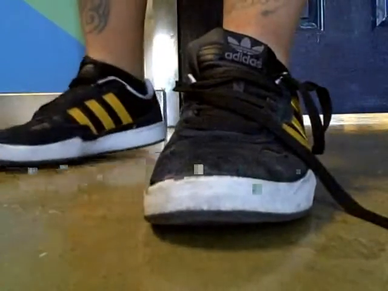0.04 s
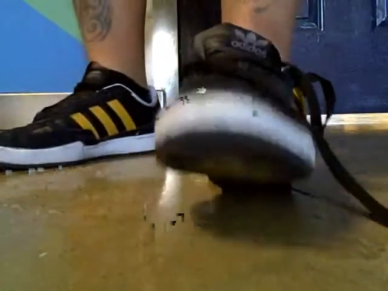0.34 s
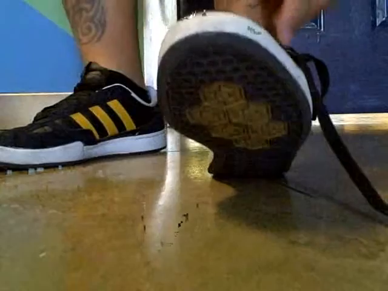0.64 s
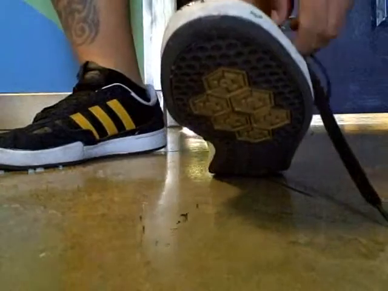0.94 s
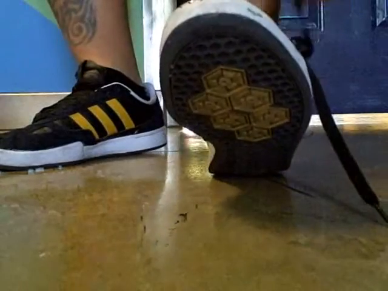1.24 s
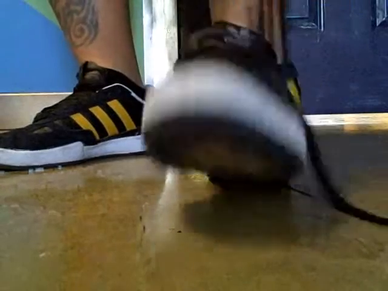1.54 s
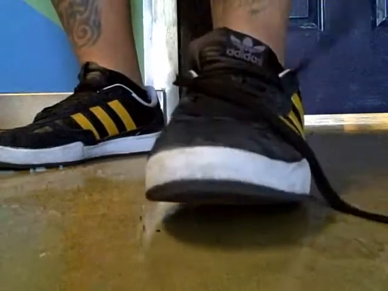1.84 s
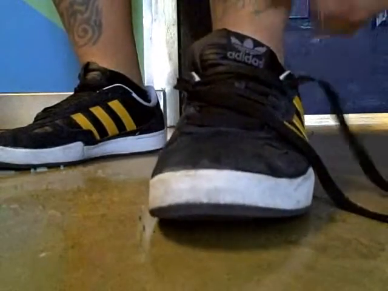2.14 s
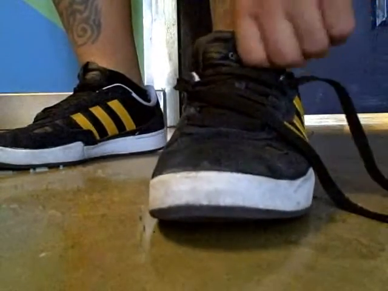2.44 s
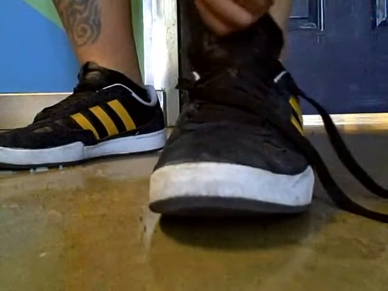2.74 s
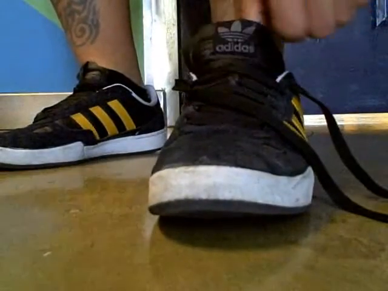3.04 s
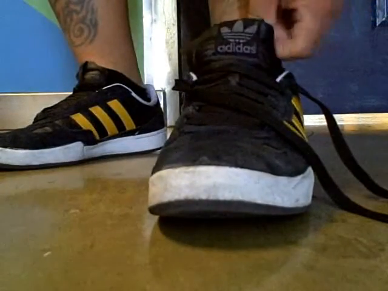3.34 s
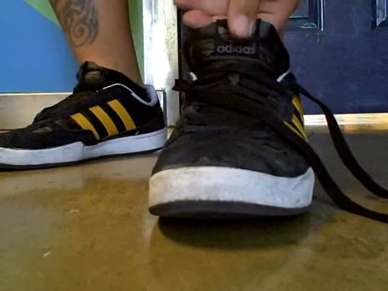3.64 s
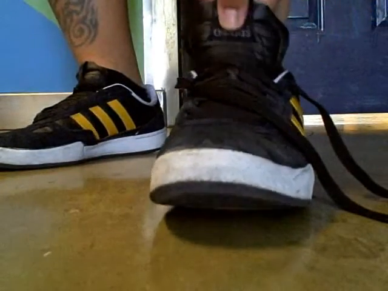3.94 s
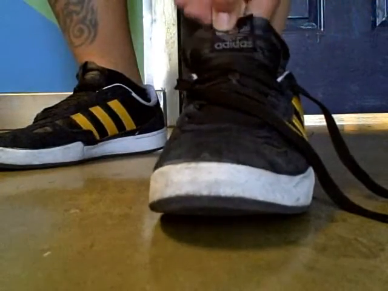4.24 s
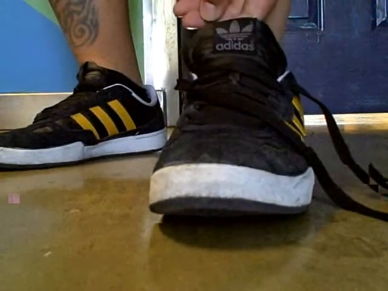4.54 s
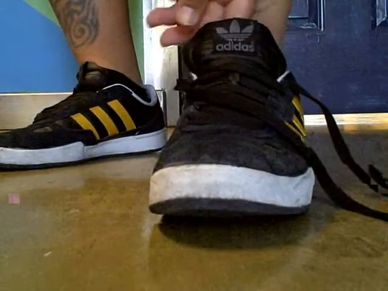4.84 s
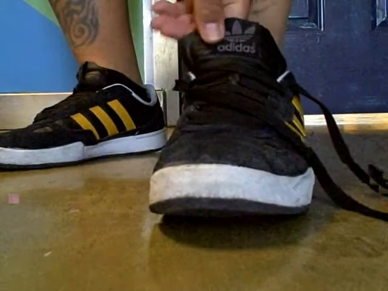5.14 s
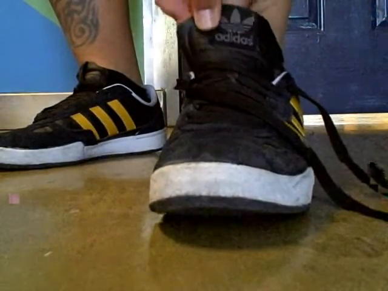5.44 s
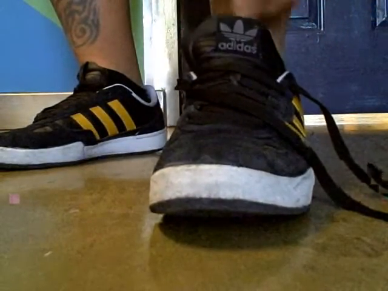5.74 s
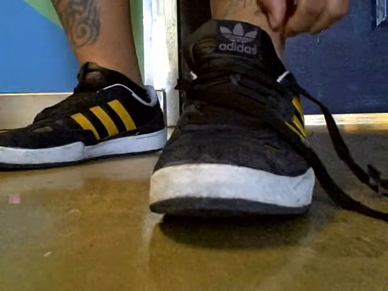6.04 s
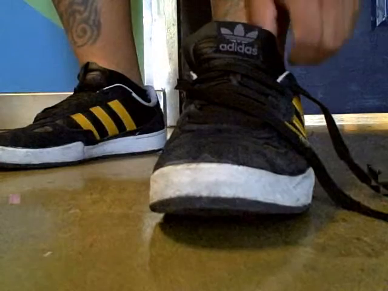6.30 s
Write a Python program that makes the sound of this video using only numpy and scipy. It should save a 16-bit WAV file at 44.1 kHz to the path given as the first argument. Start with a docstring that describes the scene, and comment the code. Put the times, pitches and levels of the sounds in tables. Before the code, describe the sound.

A small microphone is close to a sneaker in a slightly reverberant room, where a low appliance hum and faint hiss continue throughout. Everything is quiet, with crisp treble. At the start the shoe gives a soft knock and a rustling scuff as the toe lifts and the heel pivots on grit. Rubbing builds again after 1 second, and at 1.5 the sole comes down with a dull bump, clicks and a short creak. From 2 seconds fingers flick a lace and tug the tongue, making uneven bursts of cloth rubbing with small ticks and dull undertones. The strongest come near 2.6 and 4.2 seconds, with a sharp tick at 3.6. Near 4.6 all sound cuts out for a split second. A rustle and light bump follow at 5, another tug at 5.4, and fingers slide along the collar around 6.2 to 6.5.

```python
"""Indoors, a small microphone close to a sneaker on a hard floor; an appliance hums throughout.
The toe lifts and the foot rocks on its heel over grit; at 1.5 s the sole comes down with a dull bump
and a creak. From 2 s fingers flick a loose lace and tug at the tongue: cloth rubs and ticks, the padded
upper and the sole answer dully. Near 4.6 s the sound cuts out for a moment. Then the tongue is set
straight and fingers slide along the collar."""
import sys
import numpy as np
from scipy import signal
from scipy.fft import rfft, irfft
from scipy.io import wavfile

SR = 44100
rng = np.random.default_rng(int(sys.argv[2]) if len(sys.argv) > 2 else 0)


def inscribe(sig):
    """Save sig as 16-bit PCM at rate SR to the path in sys.argv[1].

    A 1-D sig is mono; a 2-D sig holds one channel per row.
    Samples are clipped to [-1, 1] before scaling.
    """
    pcm = np.round(np.clip(np.atleast_2d(sig).T, -1, 1) * 32767)
    wavfile.write(sys.argv[1], SR, pcm.astype(np.int16))


N = 285270

# mains hum, motor tones and a thin electronic whine: f/Hz, level/dB
HUM_TONES = [(58.8, -60.5), (120, -58.5), (176.5, -77), (217.5, -73), (240, -69), (360, -77.5),
             (479.5, -79.5), (563.5, -73.5), (588.5, -76.5), (683.5, -71.5), (708.5, -76.5), (734.5, -74),
             (7601, -80), (7655, -80), (8344, -80.5), (8403, -80.5)]
# spectra of the room's air and of slips in cloth, padded upper, rubber sole and grit: f/Hz, level/dB
AIR_SPECTRUM = [(12, 8.5), (30, 7), (70, 4), (150, -1), (300, -10), (700, -16), (1000, -20.5),
                (2000, -22.5), (4000, -20), (6500, -49), (10000, -45), (15500, -27)]
CLOTH_SPECTRUM = [(60, -15), (200, -1), (700, -3), (1400, 1), (2300, 2), (3900, 0.5), (5700, 0.5),
                  (10000, 1), (15500, -1)]
UPPER_SPECTRUM = [(200, -33.5), (500, -10), (680, 0), (850, 4), (1100, -3), (1400, -1.5), (2200, -7.5),
                  (3500, -9.5), (12000, -50.5)]
SOLE_SPECTRUM = [(60, -21), (170, -13), (310, -1.5), (420, -1), (600, -1), (900, -9), (2000, -38.5),
                 (12000, -53)]
GRIT_SPECTRUM = [(400, -19.5), (1200, -6.5), (2000, -3.5), (2800, 0), (3800, -4.5), (5500, -10),
                 (12000, -27)]
# cloth shifting softly against hand and ankle between the moves: t/s, level/dB
CLOTH_SHIFTS = [(0, -69), (0.07, -57), (0.93, -63), (1.27, -56), (1.72, -58), (1.83, -64), (2.15, -61),
                (2.3, -67), (2.5, -57), (3.12, -62.5), (3.55, -53.5), (4.13, -64), (4.55, -57.5),
                (4.75, -64), (5.17, -61), (5.35, -63), (5.69, -57.5), (5.74, -70)]
# moves of the foot and pulls of the fingers, each sliding cloth and bending the upper:
# t/s, attack/s, hold/s, release/s per 20 dB, cloth level/dB, upper level/dB
MOVES = [(0.02, .33, .06, .37, -43, -66.5), (0.995, .02, .02, .15, -61, -80),
         (1.14, .21, .045, .11, -54, -58.5), (1.455, .006, .008, .03, -50, -57),
         (1.491, .008, .045, .06, -45.5, -44.5), (1.540, .013, .07, .1, -42.5, -45),
         (1.855, .035, .008, .15, -51, -59), (2.06, .012, .1, .25, -60, -76),
         (2.318, .012, .09, .15, -54.5, -69.5), (2.43, .055, .025, .15, -49.5, -62.5),
         (2.555, .06, .045, .145, -39.3, -51), (2.785, .085, .05, .1, -45.3, -57),
         (3.16, .06, .02, .07, -53.5, -71), (3.365, .055, .018, .11, -45, -61),
         (3.52, .05, .05, .07, -45.5, -60), (3.76, .032, .015, .22, -47.5, -67),
         (3.83, .135, .045, .15, -50, -53.5), (4.19, .024, .012, .1, -39.4, -52.5),
         (4.225, .045, .065, .185, -41, -57), (4.985, .033, .004, .075, -42.3, -60),
         (5.09, .14, .025, .08, -55, -62), (5.39, .026, .04, .125, -41, -53.5),
         (5.67, .03, .008, .03, -57, -74), (6.18, .07, .09, .25, -49.5, -66),
         (6.39, .04, .012, .12, -49, -64)]
# weight shifts that roll the sole on the floor: t/s, attack/s, hold/s, release/s per 20 dB, level/dB
SOLE_ROLLS = [(0.035, .02, .05, .25, -52), (0.26, .03, .03, .55, -58), (1.47, .04, .07, .36, -52.5),
              (1.84, .07, .07, .24, -55), (4.995, .015, .01, .4, -55.5), (5.38, .04, .02, .6, -58),
              (5.88, .15, .4, .3, -64)]
# the heel pivoting on grit: t/s, attack/s, hold/s, release/s per 20 dB, level/dB
HEEL_PIVOTS = [(0.22, .05, .06, .55, -54.5), (1.487, .008, .008, .06, -54), (1.54, .015, .005, .22, -50)]
# laces, seams and rubber snapping free: t/s, level/dB, centre f/Hz
SNAPS = [(.0380, -18.5, 4700), (.2484, -21, 4500), (.2924, -13.5, 1900), (.3556, -24, 6000),
         (1.4585, -33, 5000), (1.4930, -19, 750), (1.5054, -22, 3000), (1.5482, -7.5, 1150),
         (1.5562, -12, 6500), (1.6160, -19, 6500), (1.6353, -18.5, 6000), (2.0706, -24, 3300),
         (2.3294, -26.5, 5000), (2.4963, -18, 3600), (2.8795, -24, 6000), (2.9123, -22, 5940),
         (2.9407, -21.5, 6000), (3.0144, -30, 6000), (3.6090, -21, 6000), (3.6180, -10, 7500),
         (3.7866, -25, 5060), (4.9955, -26, 5000), (5.0225, -24, 5000), (5.4116, -22, 4000),
         (6.3271, -22, 5000)]
# soft blows on the shoe: t/s, level/dB, low-pass f/Hz
BLOWS = [(.0383, -30.5, 700), (.0690, -38.5, 400), (1.4930, -37.5, 2480), (1.5482, -30, 2770),
         (1.5560, -35.5, 1500), (5.0005, -36, 900), (5.0150, -32, 700)]
# what the struck shoe rings with: f/Hz, level/dB, t60/s
SHOE_RESONANCES = [(195, -25.5, 0.096), (301, -18, 0.098), (370, -5, 0.026), (490, -10.5, 0.052),
                   (673, -8.5, 0.028), (780, -10.5, 0.018), (1430, -1.5, 0.0074)]
# the padding creaking where it is bent hard: middle t/s, half length/s, f/Hz, level/dB
PADDING_CREAKS = [(1.497, .005, 950, -41), (1.557, .035, 800, -45), (1.605, .02, 720, -42),
                  (2.685, 0.031, 900, -46), (3.626, 0.014, 193, -46.5), (5.427, 0.024, 1480, -50.5)]
# the small microphone's response, with two treble resonances: f/Hz, level/dB
MIC_RESPONSE = [(4000, 0.5), (5000, 5), (5800, 11), (6450, 14.5), (7400, 8.5), (8000, 3), (8600, 7.5),
                (9600, 11), (10600, 3), (11800, -4.5), (13500, -1), (15500, -5.5)]
# tone of the room's reverberation: f/Hz, level/dB
ROOM_SPECTRUM = [(300, 9.5), (900, -4), (2500, -3.5), (10000, -11)]


def from_db(db):
    """Decibels to gain."""
    return 10 ** (np.asarray(db) / 20)


def rms_one(x):
    """Scale to unit rms."""
    return x / np.sqrt(np.mean(x ** 2) + 1e-20)


def drift(rate_hz):
    """A random wander of rms 1 that changes about rate_hz times a second."""
    pole = np.exp(-2 * np.pi * rate_hz / SR)
    wander = signal.lfilter([1], [1, -2 * pole, pole * pole], rng.standard_normal(N + SR))
    return rms_one(wander[SR:])


def coloured(x, spectrum, size=8192):
    """Causal (minimum-phase) filter that follows rows of f/Hz, level/dB."""
    hz, db = np.transpose(spectrum)
    grid_hz = np.maximum(np.fft.rfftfreq(size, 1 / SR), 1)
    gain = from_db(np.interp(np.log(grid_hz), np.log(hz), db))
    cepstrum = irfft(np.log(gain))
    # folding the cepstrum onto positive time keeps the response from sounding early
    cepstrum[1:size // 2] *= 2
    cepstrum[size // 2 + 1:] = 0
    return signal.fftconvolve(x, irfft(np.exp(rfft(cepstrum))))[:N]


def ring(clicks, hz, t60):
    """Each click sets a decaying sine ringing."""
    decay, step = from_db(-60 / (t60 * SR)), 2 * np.pi * hz / SR
    return signal.lfilter([0, np.sin(step)], [1, -2 * decay * np.cos(step), decay ** 2], clicks + 1e-18)


def swells(rows, attack_power=1.3, settle_db=-16, settle_s_per_20db=.42):
    """Gain of a series of moves: each gathers speed, holds, dies away and settles; their powers add."""
    t, power = np.arange(N) / SR, np.zeros(N)
    for start, attack, hold, release, db in rows:
        rise = np.clip((t - start) / attack, 0, 1) ** attack_power
        after = np.maximum(t - start - attack - hold, 0)
        fall_db = np.maximum(-20 * after / release, settle_db - 20 * after / settle_s_per_20db)
        power += (rise * from_db(db + fall_db)) ** 2
    return np.sqrt(power)


def friction(spectrum, slips_per_s, size_db, clump_db, clump_hz):
    """Tiny slips of uneven size that bunch up as a surface catches and lets go; rms 1."""
    slips = rng.random(N) < slips_per_s / SR
    sizes = from_db(size_db * np.minimum(rng.exponential(1, N), 4)) * rng.choice([-1, 1], N)
    clumps = from_db(clump_db * drift(clump_hz))
    return rms_one(coloured(slips * sizes * clumps, spectrum))


def room_tone(waver_rad=0.26, air_db=-55.5):
    """The appliance's slightly wavering hum over a dull rush of air and a faint hiss."""
    t, hum = np.arange(N) / SR, np.zeros(N)
    for hz, db in HUM_TONES:
        phase = 2 * np.pi * (hz * t + rng.random()) + waver_rad * drift(rate_hz=1.03)
        hum += from_db(db) * np.sqrt(2) * np.sin(phase)
    air = rms_one(coloured(rng.standard_normal(N), AIR_SPECTRUM))
    return hum + from_db(air_db) * air


def rubbing(shift_bend_db=-8, sole_follows_db=-9, sole_rest_db=-65):
    """Fine fibre slips hiss, coarser ones sound in the upper and sole; grit crackles under the heel."""
    shifting = from_db(np.interp(np.arange(N) / SR, *np.transpose(CLOTH_SHIFTS)))
    slide = np.hypot(swells([(*timing, db) for *timing, db, _ in MOVES]), shifting)
    bend = np.hypot(swells([(*timing, db) for *timing, _, db in MOVES]), from_db(shift_bend_db) * shifting)
    # part of the upper's bending reaches the sole, which is never quite still
    flex = np.hypot(from_db(sole_follows_db) * bend, from_db(sole_rest_db))
    roll = np.hypot(swells(SOLE_ROLLS), flex)
    pivot = swells(HEEL_PIVOTS)
    cloth = friction(CLOTH_SPECTRUM, slips_per_s=10000, size_db=3.3, clump_db=0.7, clump_hz=104)
    upper = friction(UPPER_SPECTRUM, slips_per_s=2500, size_db=1.0, clump_db=2.3, clump_hz=70)
    sole = friction(SOLE_SPECTRUM, slips_per_s=1500, size_db=4.0, clump_db=1.5, clump_hz=25)
    grit = friction(GRIT_SPECTRUM, slips_per_s=1200, size_db=3.5, clump_db=2.0, clump_hz=86)
    return slide * cloth + bend * upper + roll * sole + pivot * grit


def ticks(fibres_db=-14.5, fibres_s=0.00078, band_ratio=3.7, top_hz=12000, size=512):
    """Each snap is one click and a millisecond of fibres settling; rubber clicks duller than lace."""
    out, age = np.zeros(N + size), np.arange(size) / SR
    for start, db, hz in SNAPS:
        snap = from_db(fibres_db) * rng.standard_normal(size) * np.exp(-age / fibres_s)
        snap[0] = 1   # the click itself
        band = signal.butter(2, [hz / band_ratio, min(hz * band_ratio, top_hz)], "band", fs=SR)
        at = round(start * SR)
        out[at:at + size] += from_db(db) * signal.lfilter(*band, snap)
    return out[:N]


def bumps(spread_db=2.1, low_cut_hz=170):
    """A soft push strikes all resonances of the shoe, a little differently each time."""
    pushes = np.zeros((len(BLOWS), N))
    for k, (start, db, soft_hz) in enumerate(BLOWS):
        push = from_db(db) * signal.unit_impulse(N, round(start * SR))
        pushes[k] = signal.lfilter(*signal.butter(1, soft_hz, fs=SR), push + 1e-18)
    strengths = from_db(rng.normal(0, spread_db, (len(BLOWS), len(SHOE_RESONANCES))))
    ringing = sum(from_db(db) * ring(strength @ pushes, hz, t60)
                  for strength, (hz, db, t60) in zip(strengths.T, SHOE_RESONANCES))
    # a body this small radiates little bass
    return signal.lfilter(*signal.butter(2, low_cut_hz, "high", fs=SR), ringing)


def creaks(slips_per_s=1500, t60_s=0.012):
    """A short swell of slips keeps one hollow resonance of the padding ringing."""
    t, out = np.arange(N) / SR, np.zeros(N)
    for middle, half_s, hz, db in PADDING_CREAKS:
        slips = (rng.random(N) < slips_per_s / SR) * rng.standard_normal(N)
        hollow = signal.lfilter([1, -1], [1], ring(slips, hz, t60_s))
        swell = np.exp(-((t - middle) / half_s) ** 2)
        out += from_db(db) * swell * rms_one(hollow)
    return out


def reverberation(x, t60_s=0.47, first_echo_s=0.013):
    """Hard walls send a diffuse tail back to the microphone, weaker in the treble."""
    age = np.arange(SR) / SR
    tail = rng.standard_normal(SR) * from_db(-60 * age / t60_s) * (age > first_echo_s)
    wet = signal.fftconvolve(x, tail / np.linalg.norm(tail))[:N]
    return coloured(wet, ROOM_SPECTRUM)


def scene(reverb_db=-12.5):
    """The shoe close up, the walls and the room tone behind it; mono."""
    shoe = rubbing() + creaks() + ticks() + bumps()
    return (shoe + from_db(reverb_db) * reverberation(shoe) + room_tone())[None]


def record(dry, dropout_s=(4.586, 4.724), top_hz=15750):
    """The small microphone lifts the treble, the signal drops out once, the top is cut."""
    t = np.arange(N) / SR
    live = (t < dropout_s[0]) | (t > dropout_s[1])
    top_cut = signal.ellip(12, .1, 80, top_hz, fs=SR, output="sos")
    return signal.sosfilt(top_cut, coloured(dry[0], MIC_RESPONSE) * live)[None]


dry = scene()
out = record(dry)
inscribe(out)
```